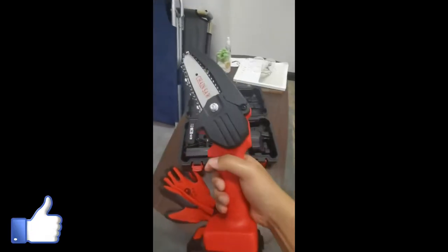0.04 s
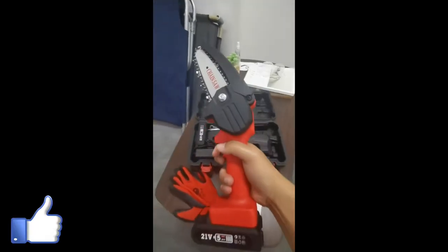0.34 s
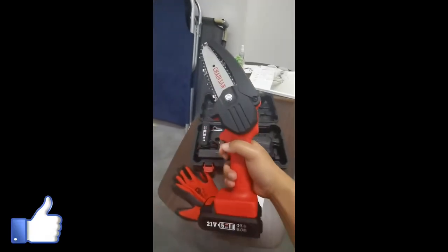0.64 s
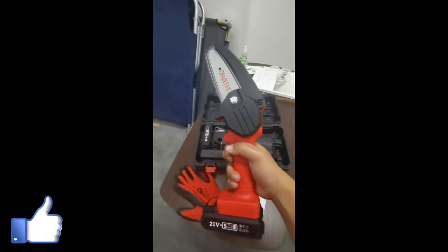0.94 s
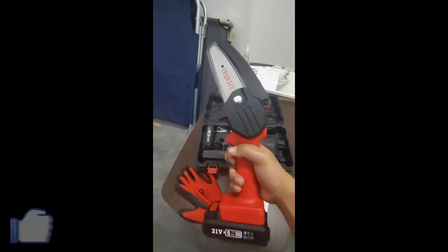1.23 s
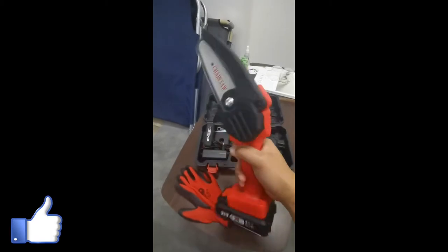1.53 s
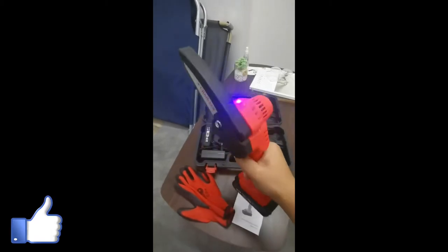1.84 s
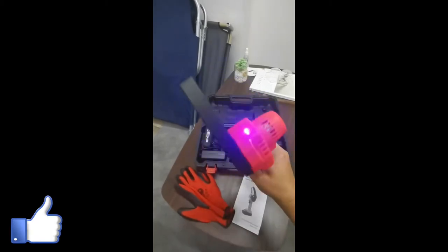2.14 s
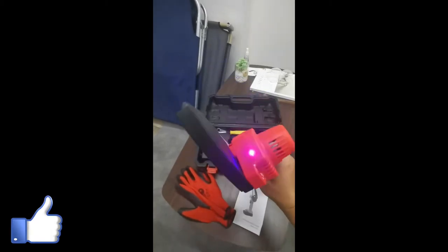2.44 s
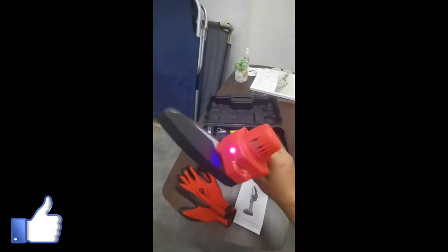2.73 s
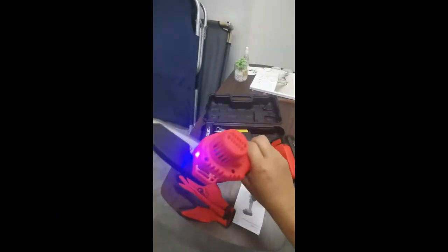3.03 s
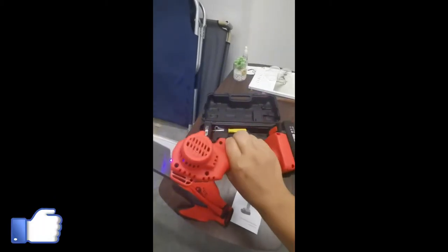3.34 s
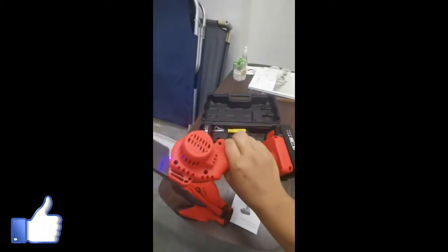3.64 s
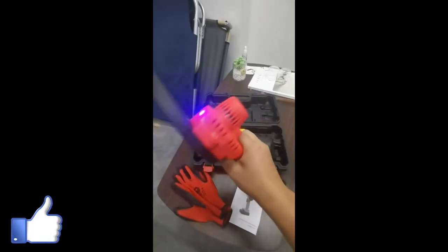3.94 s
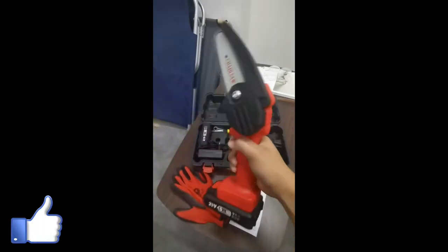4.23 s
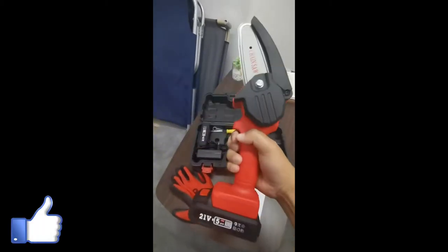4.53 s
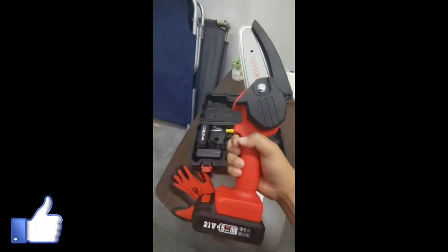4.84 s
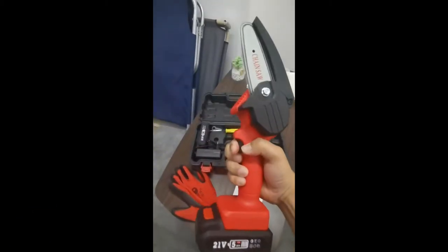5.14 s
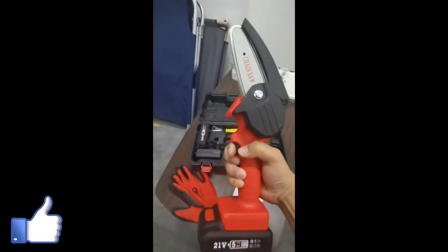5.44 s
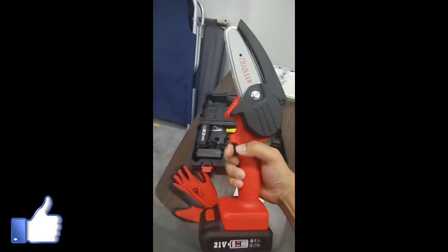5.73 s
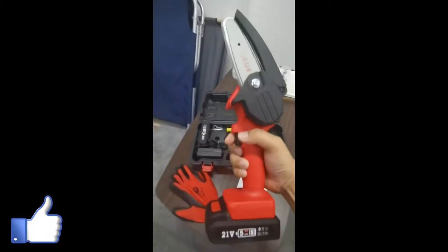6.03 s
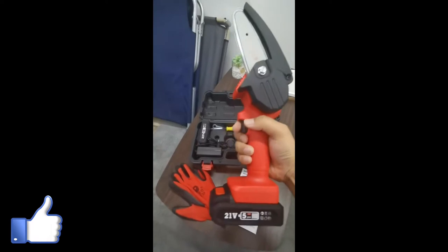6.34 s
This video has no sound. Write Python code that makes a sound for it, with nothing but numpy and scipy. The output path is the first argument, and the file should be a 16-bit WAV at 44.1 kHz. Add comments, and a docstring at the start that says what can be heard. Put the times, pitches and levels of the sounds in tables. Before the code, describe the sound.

A small battery chainsaw is switched on nearby, indoors, after a moment of soft handling noise. It jolts up to speed and runs steadily without cutting, a bright metallic rattle and hiss with a motor whine. Midway the hum and a thin whistle from the vents grow stronger, then recede. The trigger is released, and the chain slows with scattered clicks and one brief squeak.

```python
"""Quiet room, small cordless chainsaw over a table. A hand rubs on the grip, then pulls the trigger.
The housing clanks, the unbalanced rotor hums up to speed, the vents blow and whistle, and the chain
strikes and slides on its bar, rattling and hissing. The balance shifts as the saw is turned about.
Trigger released, the chain coasts: its clicks thin out and it squeaks once."""
import sys
import numpy as np
from scipy import signal
from scipy.fft import rfft, irfft, next_fast_len
from scipy.io import wavfile
from scipy.ndimage import uniform_filter1d

SR = 44100
rng = np.random.default_rng(int(sys.argv[2]) if len(sys.argv) > 2 else 0)


def int16_out(signal):
    """Quantize to a 16-bit WAV file."""
    q = np.round(np.clip(np.atleast_2d(signal).T, -1, 1) * 32767)
    wavfile.write(sys.argv[1], SR, q.astype(np.int16))


N = 286209
TIME = np.arange(N) / SR

START_S, RELEASE_S, JOLT_S = .996, 5.32, .035  # trigger on, off; decay of the starting jolt
SETTLE_AT_S, SETTLE_S = 4.65, .02  # the rattle settles into a lighter run
FREE_HZ = 418  # motor, free running
LINKS, LINKS_PER_TURN = 28, 1.1805
LINKS_PER_FLAP = LINKS / 3
VENT_DEG, VENT_WIDTH_DEG = 127, 45  # vent air and whistle are loudest near this angle
PAN = np.array([[.5], [-.5]])  # splits an L-R level difference


def from_db(db):
    """Decibels to gain."""
    return 10 ** (np.asarray(db) / 20)


def unit_rms(x):
    """Scale the channel mean to rms 1."""
    return x / np.sqrt(np.mean(np.atleast_2d(x).mean(0) ** 2) + 1e-20)


def bump(x, centre, width):
    """Bell curve, height 1."""
    return np.exp(-((x - centre) / width) ** 2)


def ramp(start_s, length_s):
    """Linear rise, 0 to 1."""
    return np.clip((TIME - start_s) / length_s, 0, 1)


def dying(start_s, decay_s):
    """1 until the start, then exponential decay."""
    return np.exp(-np.maximum(TIME - start_s, 0) / decay_s)


def drift(rate_hz):
    """Random wander, rms 1."""
    knots = rng.standard_normal(4000)
    return unit_rms(np.interp(TIME * rate_hz, np.arange(len(knots)), knots))


def at_hz(points, hz):
    """Interpolate over log frequency."""
    f, value = np.transpose(points)
    return np.interp(np.log(hz), np.log(f), value)


def filtered(x, response):
    """Apply the gain response(hz)."""
    size = next_fast_len(N + 4096)
    hz = np.maximum(np.fft.rfftfreq(size, 1 / SR), 1)
    return irfft(rfft(x, size) * response(hz), size)[..., :N]


def broad_band(x, centre_hz):
    """Broad band-pass, steeper above."""
    def response(hz):
        ratio = hz / centre_hz
        return 1 / np.sqrt(1 + (ratio - 1 / ratio) ** 2 * (1 + ratio ** 2))
    return filtered(x, response)


def noise(spectrum, channels):
    """Coloured noise, rms 1."""
    white = rng.standard_normal((channels, N))
    return unit_rms(filtered(white, lambda hz: from_db(at_hz(spectrum, hz))))


def clicks_at(times_s, heights):
    """Single-sample contacts."""
    out = np.zeros(N)
    np.add.at(out, np.clip((np.asarray(times_s) * SR).astype(int), 0, N - 1), heights)
    return out


def ring(clicks, hz, t60_s):
    """One damped mode; a unit click rings at height 1."""
    r, w = from_db(-60 / (t60_s * SR)), 2 * np.pi * hz / SR
    return signal.lfilter([0, np.sin(w)], [1, -2 * r * np.cos(w), r * r], clicks + 1e-18)


def tone(cycles, db, pan_db, lead_rad, waver_db):
    """Stereo sine; each side's level wavers."""
    level_db = db + waver_db * np.array([drift(14), drift(14)]) + pan_db * PAN
    phase = 2 * np.pi * cycles + np.array([[lead_rad], [0]])
    return np.sqrt(2) * from_db(level_db) * np.sin(phase)


def dip(driven_db, coasting_db):
    """Gain that sinks as the saw starts and partly recovers as it coasts."""
    return from_db(-driven_db * ramp(START_S, .012) + (driven_db - coasting_db) * ramp(RELEASE_S, .45))


def background(spread_hz=900):
    """Room air, mains hum and a rumble that swells once; near mono in the bass."""
    # air spectrum: f/Hz, level/dB
    air_colour = [(40, -22), (70, -3.5), (120, -9.5), (210, -5.5), (290, -10.5), (450, -16), (700, -22),
                  (1200, -31.5), (2000, -27.5), (3500, -42.5), (9000, -46.5), (15000, -50)]
    # mains lines: f/Hz, level/dB
    mains_lines = [(99, -12), (147, -16.5), (198, -16)]
    # rumble spectrum: f/Hz, level/dB
    rumble_colour = [(15, -12), (30, 14), (50, 9.5), (80, -34), (200, -61)]
    mid = noise(air_colour, channels=1)
    side = filtered(noise(air_colour, channels=1), lambda hz: 1.23 * hz / (hz + spread_hz))
    mains = sum(np.sqrt(2) * from_db(db + 2.4 * drift(5.5)) * np.sin(2 * np.pi * hz * TIME)
                for hz, db in mains_lines)
    room = from_db(-49.5) * (from_db(-5.5) * (mid + side * [[1], [-1]]) + mains)
    rumble = from_db(-55.5 + 10 * bump(TIME, .69, .27)) * noise(rumble_colour, channels=1)
    return room * dip(driven_db=18.3, coasting_db=11.4) + rumble * dip(driven_db=15.2, coasting_db=7.5)


def handling(slips_per_s=2500, attack_s=.012, release_s=.04, tick_s=.0015):
    """The palm sticks and slips on the plastic grip; the shell rustles, the grip ticks."""
    # shell spectrum: f/Hz, level/dB
    shell_colour = [(200, -20), (440, 19.5), (750, -2), (1200, -1), (2100, 1), (3500, -12), (9000, -22)]
    # strokes: t/s, length/s, hiss/dB, hiss centre/Hz, shell/dB
    rubs = [(0, 0.083, -67, 4500, -55), (0.145, 0.062, -73.5, 5000, -59.5), (0.24, 0.046, -67.5, 2770, -62),
            (0.349, 0.053, -71.5, 5400, -62.5), (.82, 0.07, -81, 9000, -83)]
    # grip ticks: t/s, peak/dB, centre/Hz
    ticks = [(.153, -55, 8000), (.462, -53, 1200)]
    slips = (rng.random(N) < slips_per_s / SR) * rng.standard_normal((2, N)) * from_db(2.5 * drift(120))
    shell = noise(shell_colour, channels=2)
    out = 0
    for start_s, length_s, hiss_db, centre_hz, shell_db in rubs:
        stroke = ramp(start_s, attack_s) * dying(start_s + length_s, release_s)
        hiss = from_db(hiss_db) * unit_rms(broad_band(slips, centre_hz))
        out = out + stroke * (hiss + from_db(shell_db) * shell)
    for start_s, db, centre_hz in ticks:
        burst = (TIME >= start_s) * dying(start_s, tick_s) * rng.standard_normal(N)
        tick = broad_band(burst, centre_hz)
        out = out + from_db(db) * tick / abs(tick).max()
    return out * from_db([[-2], [1.5]])


def faint_tones():
    """Brief soft tones before the saw starts."""
    # tones: t/s, width/s, f/Hz, level/dB
    tones = [(.01, .035, 435, -54), (.01, .03, 2159, -62), (.53, .055, 735, -67)]
    return sum(np.sqrt(2) * from_db(db) * bump(TIME, at_s, width_s) * np.sin(2 * np.pi * hz * TIME)
               for at_s, width_s, hz, db in tones)


def housing(links, tap_db=-44.5, spread_db=1.2, scatter_s=.0006):
    """The housing clanks as the slack is taken up, then ticks with each chain flap."""
    # starting knocks: t/s, level/dB
    knocks = [(1.003, -28), (1.0105, -29), (1.018, -31), (1.031, -34)]
    # housing modes: f/Hz, level/dB, t60/s
    modes = [(690, -22, .06), (931, -16, .07), (1211, -18, .06), (1868, -1, .06), (2121, -3, .06),
             (2606, -14, .04)]
    knock_s, knock_db = np.transpose(knocks)
    flap_s = np.interp(np.arange(LINKS_PER_FLAP / 4, links[-1], LINKS_PER_FLAP), links, TIME)
    late, luck = rng.standard_normal((len(flap_s), 2)).T
    taps = (TIME > START_S) * clicks_at(flap_s + scatter_s * late, from_db(tap_db + spread_db * luck))
    blows = clicks_at(knock_s, from_db(knock_db)) + taps
    return sum(ring(blows * from_db(db), hz, t60_s) for hz, db, t60_s in modes) * from_db([[-3], [2]])


def bar_responses(count, rise_s=.0003, right_lag_s=.000198):
    """Stereo impulse responses of spots on the bar: crack, dense ring, room tail; whitened."""
    # chain's L-R coherence: f/Hz, coherence/1
    coherence = [(200, 0.64), (1000, 0.24), (2000, 0.37), (4000, 0.14), (14000, 0.0088)]
    decays = [(.002, 0), (.07, -3.5), (.4, -7)]  # crack, ring, room: t60/s, energy/dB
    t = TIME[:SR // 3]
    power = sum(from_db(db) ** 2 / t60_s * from_db(-60 * t / t60_s) ** 2 for t60_s, db in decays)
    power = signal.lfilter([1], [1, -np.exp(-1 / (rise_s * SR))], power)
    mid, side = rfft(rng.standard_normal((2, count, len(t))) * np.sqrt(power / power.sum()))
    hz = np.maximum(np.fft.rfftfreq(len(t), 1 / SR), 1)
    alike = at_hz(coherence, hz)
    mid, side = np.sqrt(1 + alike) * mid, np.sqrt(1 - alike) * side
    spots = np.stack([mid + side, (mid - side) * np.exp(-2j * np.pi * hz * right_lag_s)], axis=1)
    mean_power = uniform_filter1d(np.mean(abs(spots) ** 2, axis=0), size=100)
    return irfft(spots / np.sqrt(mean_power / 2))


def link_hits(links, wear_db=2.5, cutter_db=2, chance_db=1.5, jitter_s=.00018):
    """Each link strikes in turn; every second carries a cutter, and the wear repeats each round."""
    number = np.arange(1, int(links[-1]))
    wear = rng.standard_normal(LINKS)
    late, luck = rng.standard_normal((len(number), 2)).T
    level_db = wear_db * wear[number % LINKS] + cutter_db * (-1) ** number + chance_db * luck
    hit_s = np.interp(number, links, TIME) + jitter_s * late
    return clicks_at(hit_s, from_db(level_db) * rng.choice([-1, 1], len(number)))


def chain_contacts(speed_hz, links, spots=7, loose_per_turn=8, spread_db=2.4, flutter_db=.5):
    """Loose rattle, sliding friction and link hits excite spots on the bar."""
    pace = speed_hz / speed_hz.max()
    out = 0
    for spot, response in enumerate(bar_responses(spots)):
        loose = (rng.random(N) < loose_per_turn * speed_hz / spots / SR) * rng.uniform(-.91, 1, N)
        loose *= from_db(spread_db * np.clip(drift(60), -2, 2))
        friction = np.sqrt(pace) * rng.standard_normal(N)  # fades with speed, exposing single ticks
        force = unit_rms(loose / np.sqrt(pace)) + friction
        if spot < 2:  # sprocket and nose, where links turn
            force += 1.191 * unit_rms(link_hits(links) / np.sqrt(pace))
        out = out + signal.oaconvolve(force[None], response, axes=1)[:, :N]
    return unit_rms(out * from_db(flutter_db * drift(45)))


def link_rings(low_hz=1950, high_hz=5800, rings_per_s=600, t60_s=.08, level_db=-16):
    """Each link rings at its own pitch when flicked clear of the groove."""
    flicks = int(rings_per_s * TIME[-1] / LINKS)
    out = np.zeros((2, N))
    for hz in np.geomspace(low_hz, high_hz, LINKS) * rng.uniform(.98, 1.02, LINKS):
        clicks = clicks_at(rng.uniform(0, TIME[-1], flicks), rng.uniform(.45, 1, flicks))
        pan_rad = rng.uniform(-.3, 1.9)
        out += np.outer([np.cos(pan_rad), np.sin(pan_rad)], ring(clicks, hz, t60_s))
    return from_db(level_db) * unit_rms(out)


def chain_slaps():
    """The slack chain slaps the bar."""
    # slaps: t/s, strength/dB
    slaps = [(1.003, 25), (1.021, 21), (1.038, 22), (3.232, 20), (3.338, 21), (5.734, 22), (5.914, 24),
             (6.019, 23), (6.202, 24), (6.273, 26), (6.389, 22)]
    at_s, db = np.transpose(slaps)
    return signal.oaconvolve(clicks_at(at_s, from_db(db))[None], bar_responses(1)[0], axes=1)[:, :N]


def rattle_peaks(x, edge_on, wander=.007, swell_db=.6, wander_hz=5, sink_s=1):
    """Narrow peaks colour the rattle, differently left and right; they wander and flatten edge-on."""
    # peaks: f/Hz, width/Hz, left/dB, right/dB, edge-on loss/1, settled gain/1, starting offset/Hz
    peaks = [(1842, 185, 3.5, 10.5, 0.47, 0.018, -8), (2136, 175, 4.5, 7.5, .2, 0.22, -5),
             (3060, 850, 7.8, 2.4, 0.55, 0.068, 0), (4640, 930, 5.5, 2.5, 0.48, -0.17, 0),
             (6840, 460, 4.5, 4.5, 0.05, -0.41, 0), (8110, 270, 2, 3.5, 0.2, 0.29, 0),
             (8814, 620, 13, 5.5, 0.32, 0.098, 348), (9600, 480, 3.5, 1, 0.3, -0.024, 0),
             (10640, 460, 3, 11, 0.55, -0.26, 0), (11130, 210, 1, 4, 0.5, 0.31, 0),
             (13350, 510, 1, 5.5, 0.8, 0.84, 350), (14950, 710, -1, 8.5, 0.5, 0.058, 0)]
    hz, frame_s, frames = signal.stft(x, SR, nperseg=512)
    at = np.minimum((frame_s * SR).astype(int), N - 1)
    fresh, settled = dying(START_S, sink_s)[at], ramp(SETTLE_AT_S, SETTLE_S)[at]
    gain_db = 0
    for centre_hz, width_hz, left_db, right_db, lost, gained, offset_hz in peaks:
        peak_hz = centre_hz * (1 + wander * drift(wander_hz)[at]) + offset_hz * fresh
        share = (1 - lost * edge_on[at]) * (1 + gained * settled)
        peak_db = np.array([db * share + swell_db * drift(wander_hz)[at] for db in (left_db, right_db)])
        gain_db = gain_db + peak_db[:, None] * bump(hz[:, None], peak_hz, width_hz)
    return signal.istft(frames * from_db(gain_db), SR, nperseg=512)[1][:, :N]


def near_echoes(x, edge_on, sway_s=.00006):
    """Table, case and arm reflect the saw; the paths shift as it turns and sways."""
    # reflections: delay/s, edge-on change/s, level/dB
    echoes = [(.0011, .0005, -19), (.0019, -.0007, -17), (.0031, .0009, -17)]
    out = x
    for base_s, change_s, db in echoes:
        delay_s = base_s + change_s * edge_on + sway_s * drift(3)
        echo = [np.interp(TIME - delay_s * path, TIME, side) for side, path in zip(x, (1, 1.15))]
        out = out + from_db(db) * np.array(echo)
    return out


def rattle_colour(hz):
    """Broad tone colour of the rattle in each channel, brighter on the right."""
    # spectrum: f/Hz, left/dB, right/dB
    colour = [(152, -53, -63), (343, -13.5, -9.5), (650, -22, -18.5), (848, -6.5, -13.5), (1520, -5, -9),
              (2700, -3.5, 2), (3600, -5, -0.95), (7440, -0.8, 2), (11900, -3, 4.5), (15600, -2.5, 2.5)]
    return from_db([at_hz(np.array(colour)[:, [0, side]], hz) for side in (1, 2)])


def chain(speed_hz, links, angle_deg, low_hz=2500, high_hz=7600, round_db=.38, jolt_db=5):
    """Housing clatter, rasp and bar sizzle pulse as the chain flaps; angle and speed set the mix."""
    # chain looser or tighter, nearer or farther: t/s, level/dB
    levels = [(1.0, -30), (1.14, -28), (1.35, -31), (1.6, -32.5), (1.85, -34.5), (2.03, -32.5), (2.13, -34),
              (2.35, -31), (2.85, -31.5), (3.05, -33), (3.24, -32), (3.45, -33), (3.98, -33), (4.26, -31.5),
              (4.5, -33.5), (5.6, -31), (6.1, -31.5), (6.49, -32)]
    # clatter, rasp, sizzle gains: edge-on/dB, per halving of speed/dB, settled/dB, edge-on L-R/dB
    voices = [(0, 1.5, -5.5, -7.5), (0.5, -1.5, -3, 0.8), (-0.7, -4, -3, -2)]
    flap_depths_db = (.9, .3, .22)
    edge_on, halvings = np.sin(np.radians(angle_deg)), np.log2(FREE_HZ / speed_hz)
    settled = ramp(SETTLE_AT_S, SETTLE_S)
    level_db = np.interp(TIME, *np.transpose(levels))
    level_db += round_db * np.sin(2 * np.pi * links / LINKS)  # the loop tightens once a round
    flap = np.sin(2 * np.pi * links / LINKS_PER_FLAP) * (1 + .8 * settled)
    rattle = chain_contacts(speed_hz, links) + link_rings() + chain_slaps()
    rattle = filtered(near_echoes(rattle_peaks(rattle, edge_on), edge_on), rattle_colour)
    over_low = filtered(rattle, lambda hz: 1 / (1 + (low_hz / hz) ** 10))
    over_high = filtered(rattle, lambda hz: 1 / (1 + (high_hz / hz) ** 20))
    clatter = (rattle - over_low) * from_db(jolt_db * dying(START_S, JOLT_S))
    rasp = over_low - over_high
    flare_db = bump(angle_deg, 60, 20) * np.array([[.6], [2.2]])  # bar groove faces the listener
    sizzle = over_high * from_db(flare_db)
    out = 0
    for band, flap_db, gains in zip((clatter, rasp, sizzle), flap_depths_db, voices):
        edge_db, slow_db, settled_db, pan_db = gains
        gain_db = level_db + edge_db * edge_on + slow_db * halvings + settled_db * settled
        out = out + band * from_db(gain_db + flap_db * flap + pan_db * edge_on * PAN)
    return out


def motor_speed(kick_hz=290, sag_hz_per_s=.43, spin_up_s=.1, coast_s=1.15):
    """Turns per second: kick, quick climb, sag as the battery tires, coast."""
    free_hz = FREE_HZ - sag_hz_per_s * (TIME - START_S)
    driven_hz = free_hz - (free_hz - kick_hz) * dying(START_S, spin_up_s)
    return driven_hz * dying(RELEASE_S, coast_s)


def motor(turns, speed_hz, angle_deg, edge_db=13.8, slow_db=16, mount_hz=393, jolt_db=11):
    """Rotor unbalance hums, most edge-on; sprocket and motor orders sing near full speed."""
    # drive orders: cycles/turn, level/dB, gain in the vent beam/dB, L-R/dB
    orders = [(LINKS_PER_TURN, -67, 0, -6), (2, -72, 2, 0), (2 * LINKS_PER_TURN, -58.5, 0, -2),
              (3, -69, 10, 0), (4 * LINKS_PER_TURN, -60, 0, -6)]
    hum_db = -63.2 + edge_db * np.sin(np.radians(angle_deg)) - slow_db * np.log2(FREE_HZ / speed_hz)
    hum_db += 8 * bump(speed_hz, mount_hz, 15)  # motor mount resonance
    hum_db += jolt_db * dying(START_S, JOLT_S)
    fast = np.clip((speed_hz - 260) / 50, 0, 1)
    hum = fast * tone(turns, hum_db, pan_db=-7.5, lead_rad=.74, waver_db=1)
    pull_db = 250 * np.log10(speed_hz / speed_hz.max())
    facing = bump(angle_deg, VENT_DEG, VENT_WIDTH_DEG)
    whine = 0
    for order, db, beam_db, pan_db in orders:
        cycles = order * (turns + .0071 * drift(25))
        whine = whine + tone(cycles, db + pull_db + beam_db * facing, pan_db, lead_rad=1.76, waver_db=1.5)
    return hum + whine


def vents(angle_deg, switching_hz=4998, air_db=-55, facing_db=11, cut_s=.016):
    """Until release, the vents beam cooling air and the rough whistle of the switched windings."""
    # whistle: harmonic, level/dB, L-R/dB, beam gain/dB, left aim/deg, right aim/deg, beam width/deg
    harmonics = [(1, -55, -1.5, 10.5, 122, 135, 17), (2, -59, -2, 10, 103, 112, 13)]
    # air and brush noise: f/Hz, level/dB
    air_colour = [(200, -75), (520, -19), (950, 9), (1700, 5), (3700, -43), (5100, 18.5), (7000, 10),
                  (15000, -27)]
    cycles = switching_hz * TIME + .08 * drift(70) + .06 * drift(500)
    whistle = 0
    for k, db, pan_db, beam_db, left_deg, right_deg, width_deg in harmonics:
        beam = bump(angle_deg, np.array([[left_deg], [right_deg]]), width_deg)
        whistle = whistle + tone(k * cycles, db + beam_db * beam, pan_db, lead_rad=.79, waver_db=2)
    facing = bump(angle_deg, VENT_DEG, VENT_WIDTH_DEG)
    air = from_db(air_db + facing_db * facing) * noise(air_colour, channels=2)
    return dying(RELEASE_S, cut_s) * (whistle + air)


def squeak(at_s=6.37, width_s=.035, centre_hz=3920, fall_hz_per_s=4500, level_db=-44.5):
    """The coasting chain squeaks in its groove."""
    hz = centre_hz - fall_hz_per_s * np.clip(TIME - at_s, -.1, .1) + 50 * drift(300)
    return bump(TIME, at_s, width_s) * tone(np.cumsum(hz) / SR, level_db, pan_db=0, lead_rad=1, waver_db=2)


def scene(rise_s=.009):
    """Motor speed drives hum and chain; the saw's angle sets what faces the listener."""
    # wrist turn: t/s, angle/deg (0 = chain cover towards the listener; vents loudest near 127)
    wrist = [(1.0, 14), (1.25, 31.6), (1.65, 15.6), (2.28, 80), (3.05, 122), (3.72, 144), (4.2, 74),
             (4.72, 1), (6.49, 15)]
    angle_deg = np.interp(TIME, *np.transpose(wrist))
    speed_hz = motor_speed()
    turns = np.cumsum(speed_hz) / SR
    links = LINKS_PER_TURN * turns
    saw = chain(speed_hz, links, angle_deg) + motor(turns, speed_hz, angle_deg)
    saw += vents(angle_deg) + squeak()
    return ramp(START_S, rise_s) * saw + housing(links) + handling() + faint_tones() + background()


def record(dry, cutoff_hz=15600):
    """Steep low-pass."""
    return signal.sosfilt(signal.ellip(12, .1, 80, cutoff_hz, fs=SR, output="sos"), dry)


dry = scene()
out = record(dry)
int16_out(out)
```